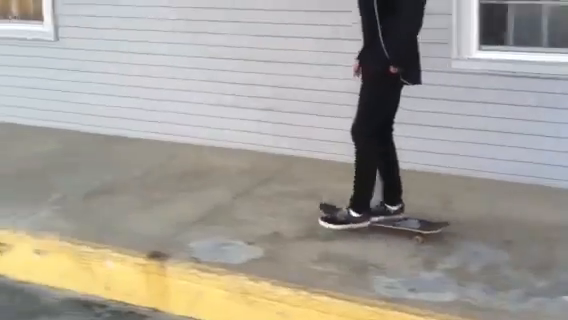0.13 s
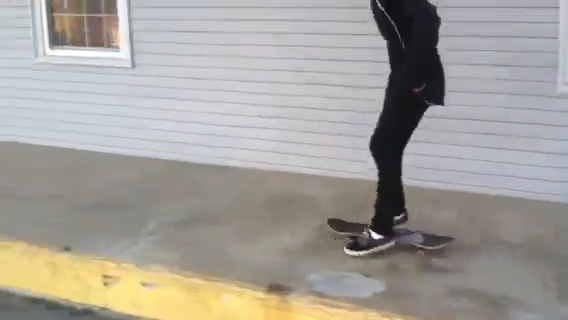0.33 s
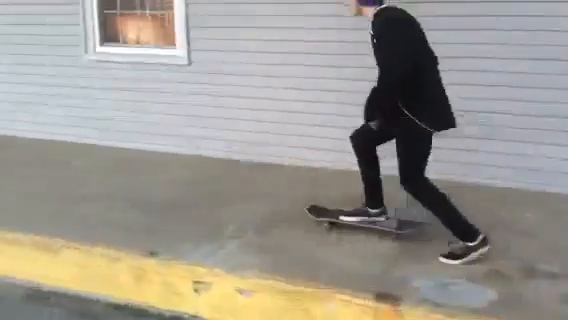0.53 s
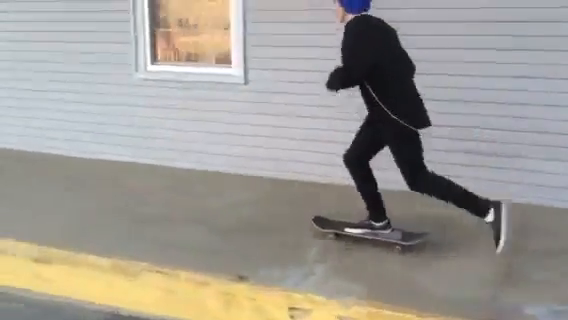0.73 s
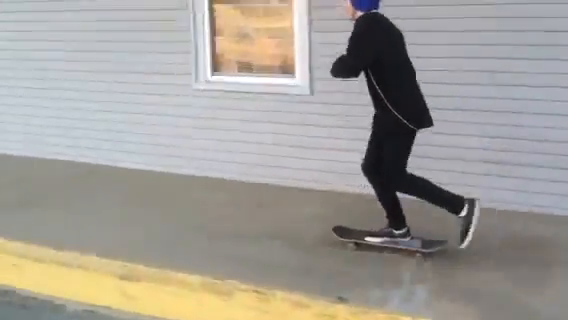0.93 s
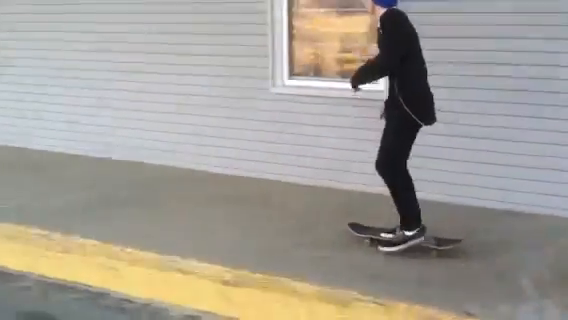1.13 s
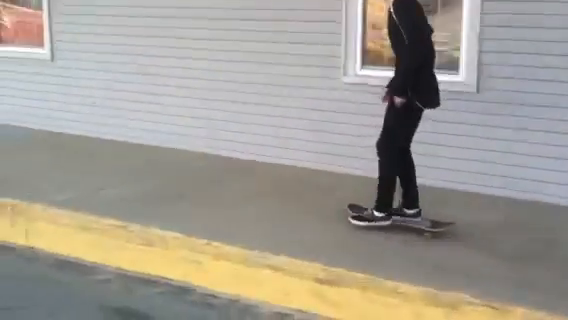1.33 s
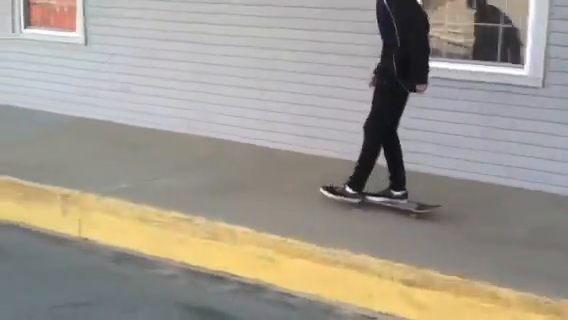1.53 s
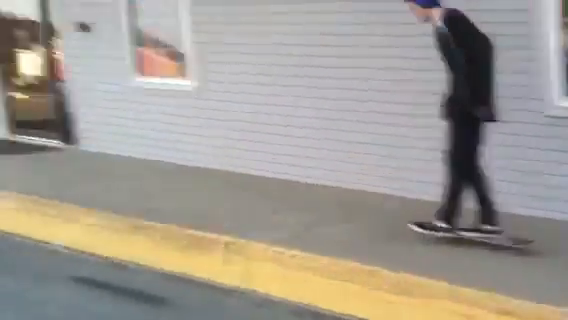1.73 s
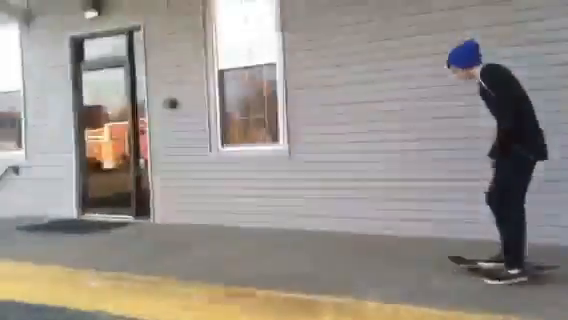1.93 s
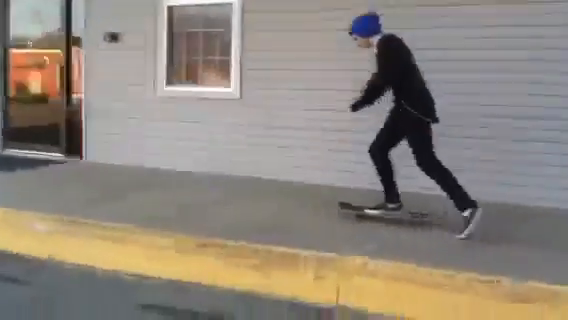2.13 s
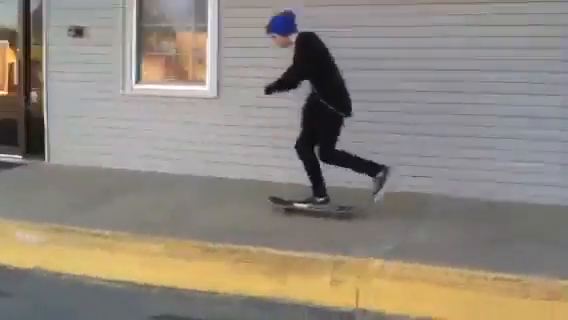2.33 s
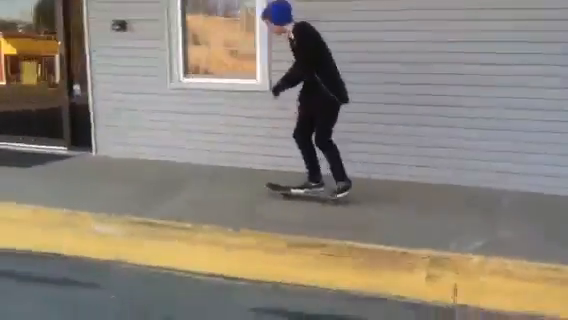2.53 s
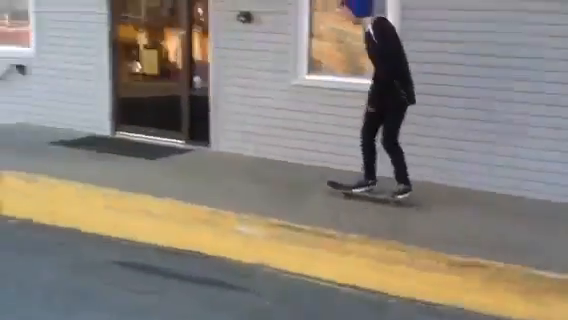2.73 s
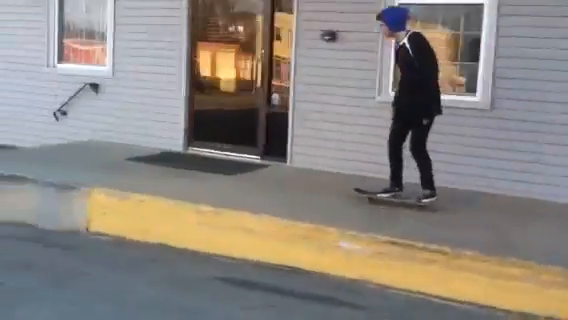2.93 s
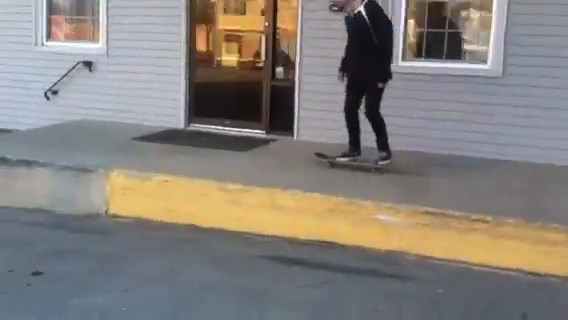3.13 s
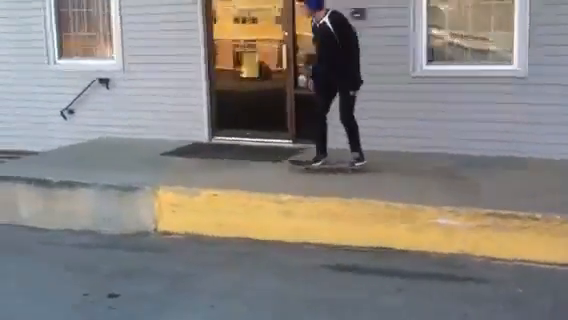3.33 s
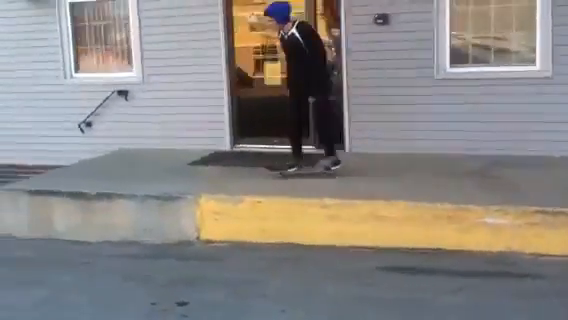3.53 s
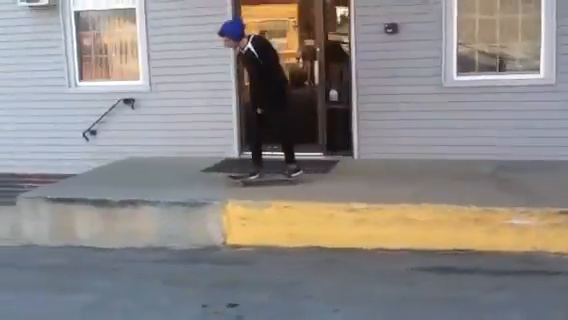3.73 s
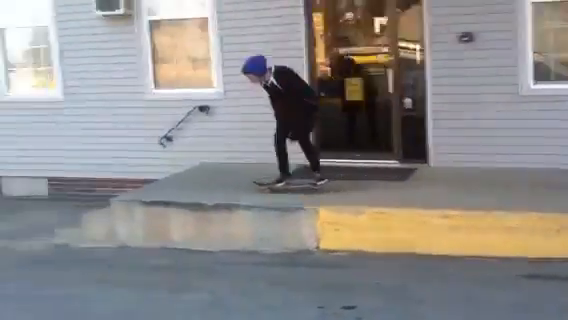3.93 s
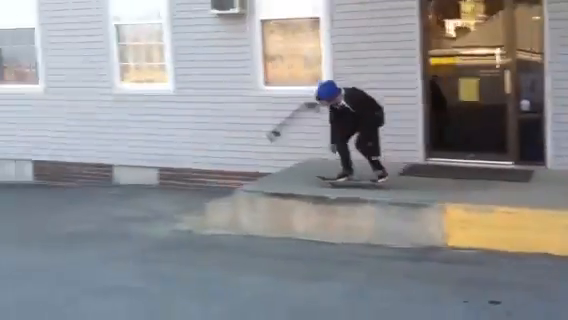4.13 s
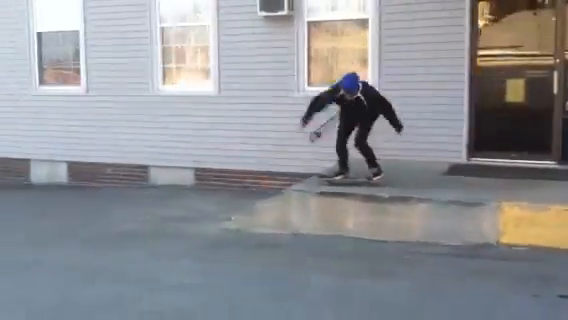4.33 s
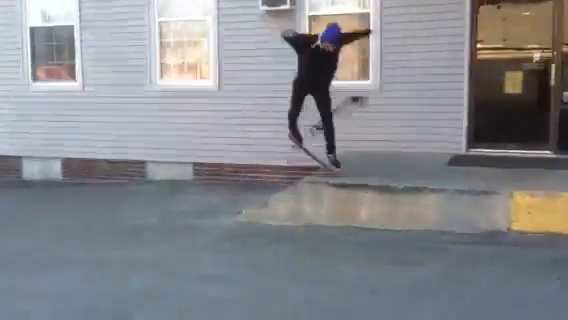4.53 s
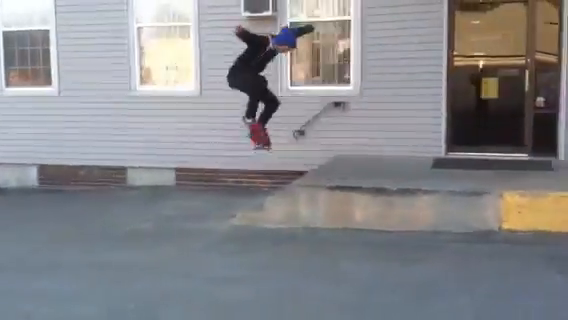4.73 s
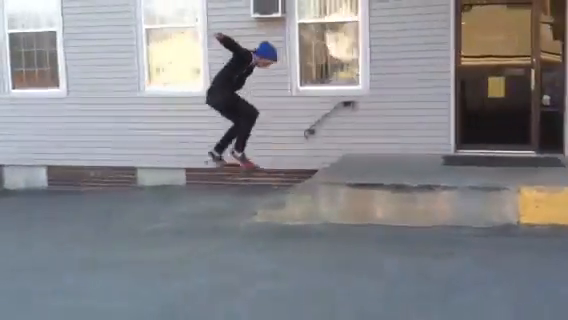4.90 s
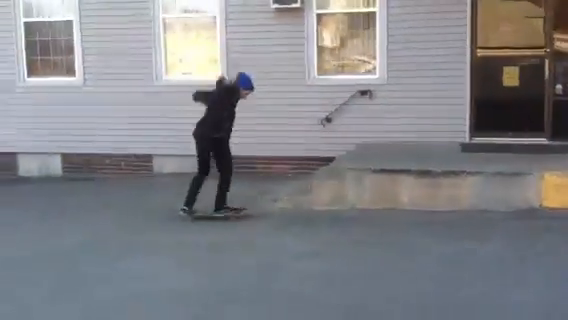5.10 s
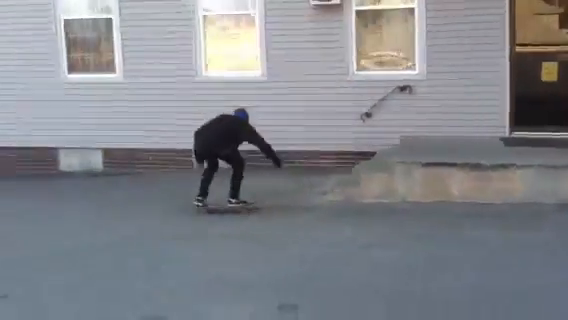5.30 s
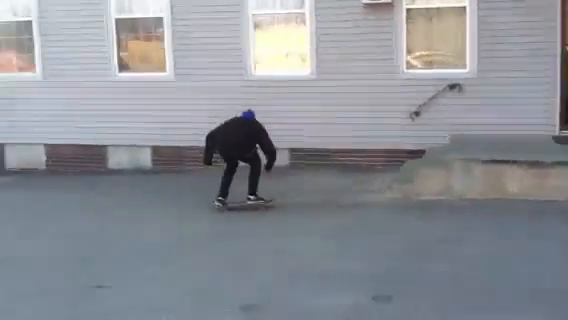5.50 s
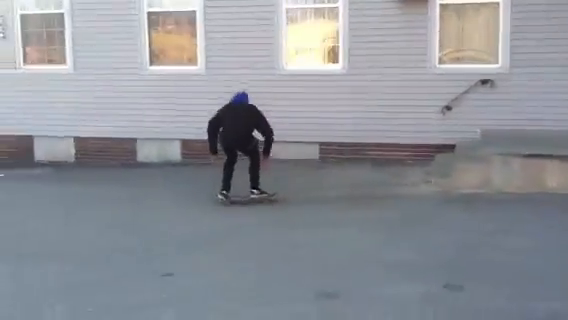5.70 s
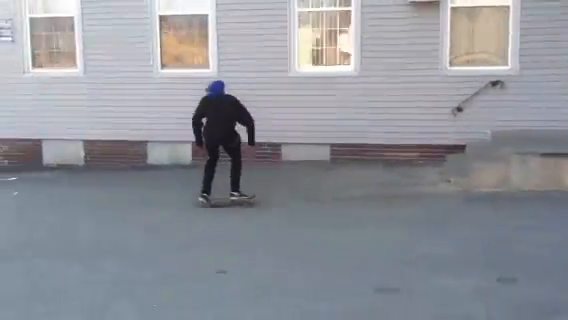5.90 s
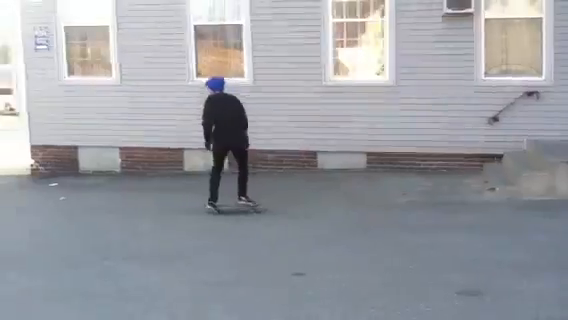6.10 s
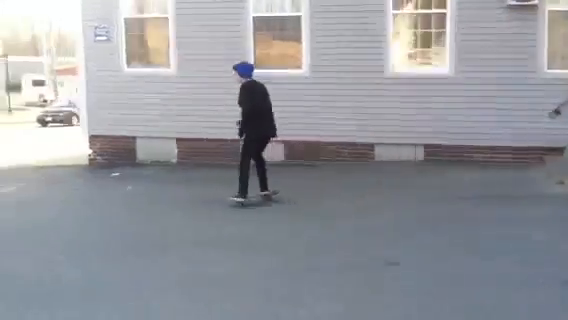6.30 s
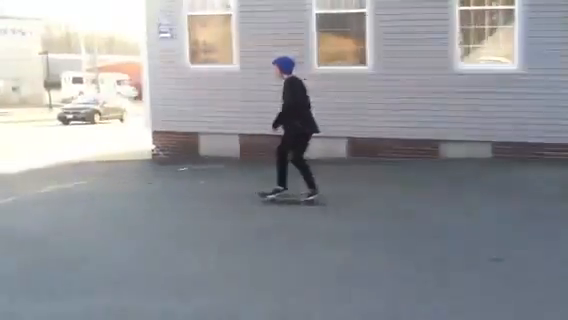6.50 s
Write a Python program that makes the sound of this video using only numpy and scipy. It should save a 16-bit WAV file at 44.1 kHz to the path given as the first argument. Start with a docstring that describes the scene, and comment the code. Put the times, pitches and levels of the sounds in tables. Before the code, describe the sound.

After a blink of silence, rolling starts abruptly at 0.13 s: a close, hollow deck roar with low thrum, and a farther board's coarse, sandy grinding. Grit crunches at 0.25-0.4, then a shoe scuffs from 0.4 to 0.75. A light wooden clatter comes at 1.05. Cracks knock at 1.3, 1.63 and 2.53, with small pebble tocks between; grinding swells around 1.75 and 2.2, with a scuff near 2.05 and faint high squeaks. A cluster of knocks and low thuds falls at 2.9-3.35, with a soft clack at 3.41. Trucks tick around 3.85. At 4.63 the tail pops sharply; rolling from the near board continues. At 5.16-5.2 the landing hits loudest, several rapid wooden clacks with plywood ringing and a faint skid. Quieter, smoother rolling follows, with small ticks and knocks, a swelling scuff peaking near 6.5, ending mid-roll. Outdoor, short dull wall reflections.

```python
"""Two skateboards on a concrete walk

Two boards roll beside a wall; the microphone travels with the nearer one. Random grit excites its deck
(hollow roar), thrum and wheel colours; cracks and stones add decaying sines. The farther rider scuffs
(filtered grit), pops the tail and lands with a clatter on asphalt (noise-driven board modes, ringing
plywood), with trucks rattling (decaying noise bursts) and a short dull tail off the surroundings."""
import sys
import numpy as np
from scipy import signal
from scipy.fft import rfft, irfft
from scipy.io import wavfile
from scipy.ndimage import uniform_filter1d, map_coordinates

SR = 44100
rng = np.random.default_rng(int(sys.argv[2]) if len(sys.argv) > 2 else 0)


def unload_audio(sound):
    """Save the sound as a 16-bit wav file, at the path given as the first command line argument."""
    columns = np.transpose(np.atleast_2d(sound))
    # keep every value between -1 and 1, then stretch to whole-number steps
    steps = np.round(np.clip(columns, -1, 1) * 32767)
    wavfile.write(sys.argv[1], SR, steps.astype(np.int16))


N = 289075

START_S, EDGE_HZ = .134, 15700  # sound onset; upper band limit

# spectra, only the shape counts: f/Hz, relative level/dB
DECK_COLOUR = [(200, -42), (400, -14.5), (550, 0), (620, 2.5), (680, -2), (760, -11), (870, -19),
               (1100, -19), (1600, -31), (6000, -83)]
THRUM_COLOUR = [(30, -42), (80, -22.5), (120, -12.5), (170, -3.5), (230, -3), (305, 1.5), (385, -6.5),
                (480, -11), (1500, -60)]
WHEEL_COLOUR = [(300, -42.5), (750, 5.5), (1030, 4.5), (1400, -2.5), (1650, -4.5), (2000, -9),
                (2350, -12.5), (2900, -23), (9000, -71.5)]
SAND_COLOUR = [(1000, -14), (2300, 5.5), (2950, 0), (4500, 2), (5500, -5), (6600, -1.5), (7900, -7),
               (9000, -3), (10400, -10.5), (12000, -15), (15500, -46)]
SHOE_COLOUR = [(700, -5), (1200, 12.5), (1750, 14), (2200, -3.5), (2800, -3), (3500, 4.5), (4400, 3),
               (5400, -8), (6600, -1.5), (8000, -7), (9000, -6), (10400, -13), (15500, -33)]
CRUNCH_COLOUR = [(100, -13), (750, 6), (1800, -5.5), (2500, -8), (4200, -5), (5300, -20.5), (6500, -7),
                 (7900, -17), (9200, -10.5), (11000, -27), (15500, -63)]
RATTLE_COLOUR = [(500, -35), (1000, 12), (2300, 8), (3000, -6.5), (4700, 0), (5700, -6.5), (15000, -59)]
PLYWOOD_COLOUR = [(300, -28), (650, 11), (880, 0), (1100, 12), (1350, 11), (1680, 7), (2050, -21),
                  (9000, -67)]

# near deck's roar over time: t/s, level/dB
NEAR_ROLL = [(0.14, -19.5), (0.42, -19), (0.57, -22.5), (1.55, -22.5), (2.25, -19.5), (3.05, -17.5),
             (4.1, -22), (4.65, -21.5), (5.2, -25), (5.3, -27), (6.05, -25.5), (6.54, -21.5)]
# changes in roar and thrum along the way: t/s, length/s, roar change/dB, thrum change/dB
ROLL_CHANGES = [(0.527, 0.12, -3.5, -1), (0.718, 0.28, -1.5, 2), (1.735, 0.21, 6.5, 3.5),
                (1.974, 0.14, -3.5, -2), (2.135, 0.2, 3, 0.5), (2.754, 2.7, 0, 2),
                (4.886, 0.11, -0.5, -4.5)]
# cracks under the near wheels: t/s, relative level/dB, swing t60/s
BUMPS = [(.384, -1, 0.014), (1.297, -2.5, 0.031), (1.361, -4, 0.02), (1.632, 9, 0.0061), (2.112, -6, 0.023),
         (2.528, 8, 0.019), (2.875, -12, 0.014), (2.928, 1, 0.049), (3.0, -3, 0.045), (3.049, 7, 0.011),
         (3.07, 6.5, 0.0091), (3.268, -0.5, 0.017), (3.344, -6.5, 0.1), (3.867, -3, 0.089),
         (4.312, -12, 0.06), (4.376, -6.5, 0.046), (4.879, -12, 0.033), (5.425, -6, 0.021),
         (5.836, -9, .035), (5.924, -6, 0.017)]
# loose stones under the wheels: t/s, relative level/dB, f/Hz
PEBBLES = [(0.806, -13, 1300), (1.017, -11, 1100), (1.123, -12.5, 1250), (2.171, -9, 1100),
           (2.367, -10, 1340), (2.469, -7, 1160), (2.611, -9, 1200), (2.745, -12, 1100), (3.906, -11, 940),
           (4.056, -11, 990)]
# low thuds and a brief swell of the thrum: t/s, relative level/dB, f/Hz
LOW_PULSES = [(3.11, -8.5, 176), (3.142, -18, 150), (3.203, -14, 160), (3.267, -13, 160), (3.298, -18, 125),
              (4.035, -14.5, 198), (4.053, -11.5, 174), (5.04, -15, 288), (5.218, -15, 181),
              (5.257, -15.5, 173)]

# coarse grinding of the rolling over time: t/s, relative level/dB
GRINDING = [(0.14, -27.5), (0.45, -26.5), (1.0, -27.5), (1.47, -30), (1.78, -23.5), (1.98, -27.5),
            (2.18, -24.5), (2.72, -25.5), (2.86, -29.5), (4.4, -33), (5.15, -33.5), (5.35, -37.5),
            (6.05, -33.5), (6.54, -30)]
# thick grit under the wheels: t/s, relative level/dB
GRAVEL = [(.24, -21), (.271, -22), (.334, -25), (.39, -16.5), (1.748, -24), (1.85, -28), (2.397, -25)]
# shoe on sandy ground or grip tape: t/s, length/s, relative level/dB, rise/s
SCUFFS = [(0.392, 0.25, -25, 0.028), (0.627, 0.13, -30, 0.043), (0.882, 0.048, -31, .02),
          (2.036, 0.096, -24.5, 0.092), (2.653, 0.16, -34, 0.027), (3.851, 0.071, -35.5, .03),
          (6.243, 0.38, -18.5, 0.26)]
# far board's struck modes: f/Hz, relative level/dB, t60/s
BOARD_MODES = [(742, 2.5, 0.022), (1086, -2.5, 0.025), (1420, -6.5, 0.021), (1650, -7, .022),
               (2100, -13.5, .016), (2810, -9.5, 0.015), (3280, -6, 0.0097), (3580, -6.5, 0.013),
               (4130, -14, 0.012), (6020, -18, .014)]
# blows on the far board:
# t/s, crunch level/dB, contact t60/s, plywood relative level/dB, clack f/Hz, clack peak before band-pass/dB
CLACKS = [(1.0405, -33, .012, -24, 1200, -12), (1.0492, -29, .008, -20, 3700, -17),
          (1.051, -29, 0.071, -20, 950, -15), (1.063, -27, 0.051, -31, 1150, -12),
          (3.413, -23.5, 0.11, -26, 4150, -21), (4.6296, -18, 0.015, -19, 1900, -7.5),
          (4.6405, -38, .025, -28, 1500, -12), (4.6415, -38, 0.032, -30, 2900, -10.5),
          (4.653, -33, .22, -36, 3400, -20), (5.1587, -15.5, 0.028, -28, 1100, -6.5),
          (5.167, -16, .011, -26, 760, -8), (5.173, -10.5, 0.023, -22, 1500, -2.5),
          (5.1883, -25, 0.099, -21, 1660, -11), (5.1975, -28, 0.018, -20.5, 700, -6)]
# scale of the trucks' random chatter: t/s, relative level/dB
CHATTER = [(1.7, -36), (2.6, -30.5), (3.2, -39.5), (4.6, -36), (5.1, -38), (5.33, -54), (5.5, -34),
           (5.9, -38)]
# harder knocks of loose trucks: t/s, relative level/dB
TICKS = [(0.5434, -35), (.914, -29), (1.02, -32), (1.252, -31), (2.325, -27), (2.68, -27), (2.685, -35),
         (2.7242, -28), (2.75, -29), (3.823, -32), (3.834, -29.5), (3.8633, -28.5), (3.87, -31),
         (4.246, -31.5), (4.431, -33), (4.697, -31.5), (4.7386, -31.5), (5.069, -34.5), (5.6176, -35),
         (5.762, -32), (6.198, -30.5)]
# loose washer's ping, higher once the rider crouches: t/s, f/Hz
WASHER = [(3.85, 4200), (4.3, 4766)]
# short fuzzy high tones, a scuff, then bearing squeaks: t/s, rms level/dB, length/s, f/Hz
SQUEAKS = [(.53, -36, 0.034, 4140), (1.67, -48.5, 0.31, 8470), (1.905, -38.5, 0.028, 6550),
           (2.225, -43, 0.049, 6600)]
# wheels skidding sideways as the landing settles: t/s, rms level/dB, length/s, f/Hz
SKIDS = [(5.2, -43, 0.32, 1660)]

DECK_SWAY = .028  # rms share by which the deck's pitch drifts
THRUM_DB, THRUM_FOLLOW = -12, 0.62  # thrum follows the roar by this share of its dB
CROSSING_S = 0.035  # ramp into and out of a roll change
SCUFF_SAG_DB_PER_S, SCUFF_RELEASE_S = 36.5, 0.039  # weight leaves the shoe; release time constant
# sand hiss follows the grinding and the roar changes by these shares of their dB
SAND_DB, SAND_FOLLOW_GRINDING, SAND_FOLLOW_ROAR = -24, 0.6, 0.22
WASHER_T60_S, WASHER_DB = 0.019, -0.5


def amp(db):
    """Decibels to gain."""
    return 10 ** (np.asarray(db) / 20)


def unit(x):
    """Scales to rms 1."""
    return x / np.sqrt(np.mean(x ** 2) + 1e-20)


def curve(rows):
    """Control joined by straight lines, per sample."""
    return np.interp(np.arange(N) / SR, *np.transpose(rows))


def add(mix, t_s, sound):
    """Mixes a sound in at t_s."""
    part = mix[round(t_s * SR):][:len(sound)]
    part += sound[:len(part)]


def butter(x, order, cut_hz, kind):
    """Butterworth filter, causal."""
    return signal.sosfilt(signal.butter(order, cut_hz, kind, fs=SR, output="sos"), x)


def colour(x, points, size=4096):
    """Minimum-phase filter of unit energy with the given spectrum, via the folded cepstrum."""
    hz, db = np.transpose(points)
    bins_hz = np.fft.rfftfreq(size, 1 / SR)
    log_gain = np.log(amp(np.interp(np.log(bins_hz + 1), np.log(hz), db)))
    cepstrum = irfft(log_gain)[:size // 2]
    cepstrum[1:] *= 2
    taps = irfft(np.exp(rfft(cepstrum, size)))
    return signal.oaconvolve(x, taps / np.linalg.norm(taps))[:len(x)]


def wander(hz):
    """Smooth random drift of rms 1: noise under a Gaussian low-pass of width hz."""
    lowpass = np.exp(-(np.fft.rfftfreq(N, 1 / SR) / hz) ** 2)
    return unit(irfft(rfft(rng.standard_normal(N)) * lowpass, N))


def grit(per_s, spread_db, smooth):
    """Stones of uneven size met at random, over a bed of fine roughness; rms 1."""
    size = amp(spread_db * np.minimum(rng.exponential(1, N), 3))
    stones = size * rng.choice([-1, 1], N) * (rng.random(N) < per_s / SR)
    return unit(unit(stones) + smooth * rng.standard_normal(N))


def dying(kicks, t60_s):
    """Turns each kick into an envelope that falls 60 dB in t60_s."""
    return signal.lfilter([1], [1, -amp(-60 / (t60_s * SR))], kicks)


def swells(rows, width_hz):
    """Each row is a short swell of a fuzzy tone: narrow-band noise under a Hann window."""
    out = np.zeros(N)
    for t_s, db, length_s, hz in rows:
        t = np.arange(round(length_s * SR)) / SR
        noise = rng.standard_normal(len(t)) + 1j * rng.standard_normal(len(t))
        band = np.exp(-(np.fft.fftfreq(len(t), 1 / SR) / width_hz) ** 2)
        fuzz = np.fft.ifft(np.fft.fft(noise) * band)
        tone = (fuzz * np.exp(2j * np.pi * hz * t)).real
        add(out, t_s, amp(db) * unit(tone * np.hanning(len(t))))
    return out


def patchy(x, depth_db):
    """Changing contact shifts the colour in random patches of frequency and time."""
    spectra = signal.stft(x, nperseg=512)[2]
    patches = uniform_filter1d(rng.standard_normal(spectra.shape), size=7, axis=0)
    patches = unit(uniform_filter1d(patches, size=9, axis=1))
    return signal.istft(spectra * amp(depth_db * patches), nperseg=512)[1][:N]


def roll_change_db(column):
    """Sums one column of the roll changes, each ramped in and out."""
    t = np.arange(N) / SR
    total_db = np.zeros(N)
    for row in ROLL_CHANGES:
        start_s, length_s = row[:2]
        edge_s = np.minimum(t - start_s, start_s + length_s - t)
        total_db += row[column] * np.clip(.5 + edge_s / CROSSING_S, 0, 1)
    return total_db


def yard(x, t60_s=0.41, tail_db=-13, dull_hz=2200):
    """Wall, kerb and ground scatter a short tail: decaying noise taps, low-passed."""
    t = np.arange(SR // 2) / SR
    taps = rng.standard_normal(len(t)) * (t > .006) * amp(-60 * t / t60_s)
    taps = butter(taps / np.linalg.norm(taps), 2, dull_hz, "low")
    return x + amp(tail_db) * signal.oaconvolve(x, taps)[:N]


def far_wheels(ground):
    """Hard wheels grind over coarse grains."""
    grains = grit(per_s=600, spread_db=5.5, smooth=1.0) * amp(1.37 * ground + 0.45 * wander(43))
    return unit(colour(grains, WHEEL_COLOUR)) * amp(curve(GRINDING) - 0.86)


def scuffing():
    """Each scrape of a shoe swells, sags while it drags, and dies as the foot lifts."""
    out, t = np.zeros(N), np.arange(SR) / SR
    for t_s, length_s, db, rise_s in SCUFFS:
        lift = np.exp(-np.maximum(t - length_s, 0) / SCUFF_RELEASE_S)
        add(out, t_s, np.minimum(t / rise_s, 1) * amp(db - SCUFF_SAG_DB_PER_S * t) * lift)
    return out


def sand(ground):
    """Fine sand hisses under the wheels; a shoe dragging on it excites its own broad colour."""
    fine = grit(per_s=1300, spread_db=9.0, smooth=1.83) * amp(0.9 * ground + 0.43 * wander(76))
    drag = grit(per_s=1500, spread_db=-0.5, smooth=0.41) * amp(2.35 * wander(61))
    hiss_db = SAND_DB + SAND_FOLLOW_GRINDING * curve(GRINDING)
    hiss_db += SAND_FOLLOW_ROAR * roll_change_db(column=2)
    hiss = unit(colour(fine, SAND_COLOUR)) * amp(hiss_db)
    shoe = unit(colour(drag, SHOE_COLOUR)) * scuffing()
    return hiss + shoe


def crackle(ground, patch_s=0.0062, loose_db=-11, snap_db=-8):
    """Loose grit cracks under the wheels, grain by grain, and crunches where it lies thick."""
    t = np.arange(N) / SR
    thick = sum(amp(db) * np.exp(-((t - t_s) / patch_s) ** 2) for t_s, db in GRAVEL)
    loose = amp(curve(GRINDING) + loose_db + 2 * ground)
    grains = thick * grit(per_s=1500, spread_db=3.5, smooth=0)
    grains += loose * grit(per_s=220, spread_db=2.5, smooth=0)
    return colour(grains, WHEEL_COLOUR) + amp(snap_db) * colour(grains, RATTLE_COLOUR)


def rattle(per_s=65, knock_db=2, t60_s=0.032):
    """Trucks chatter all along the ride, with some harder knocks; each kick also pings a washer."""
    kicks = (rng.random(N) < per_s / SR) * rng.random(N) * amp(curve(CHATTER))
    for t_s, db in TICKS:
        add(kicks, t_s, amp([db + knock_db]))
    envelope = uniform_filter1d(dying(kicks, t60_s), size=30)
    chatter = colour(envelope * rng.standard_normal(N), RATTLE_COLOUR)
    turns = np.cumsum(curve(WASHER) + 200 * wander(59.9)) / SR
    ping = dying(kicks, WASHER_T60_S) * np.sin(2 * np.pi * turns)
    return amp(3.0) * chatter + amp(WASHER_DB) * ping


def squeaks():
    """Short fuzzy high tones: a scuff, then bearing squeaks."""
    return swells(SQUEAKS, width_hz=540)


def wheel_skids():
    """Wheels skid sideways: a fuzzy tone."""
    return swells(SKIDS, width_hz=240)


def clacks(contact_s=0.003, rise_s=0.00077, ring_t60_s=0.28, focus_db_per_octave=7, band_hz=(520, 8000)):
    """Chatter of contact crunches and drives the modes nearest its pitch; then the plywood shudders."""
    crunches, knocks, kicks = np.zeros(N), np.zeros(N), np.zeros(N)
    t = np.arange(SR // 4) / SR
    for t_s, db, t60_s, ring_db, hz, knock_db in CLACKS:
        contact = np.minimum(t / rise_s, 1) * amp(-60 * np.maximum(t - contact_s, 0) / t60_s)
        add(crunches, t_s, amp(db) * contact * rng.standard_normal(len(t)))
        modes = np.zeros(len(t))
        for mode_hz, mode_db, mode_t60_s in BOARD_MODES:
            focused_db = mode_db - focus_db_per_octave * abs(np.log2(mode_hz / hz))
            modes += np.sin(2 * np.pi * mode_hz * t) * amp(focused_db - 60 * t / mode_t60_s)
        knock = signal.fftconvolve(contact * rng.standard_normal(len(t)), modes)
        add(knocks, t_s, amp(knock_db) * knock / abs(knock).max())
        add(kicks, t_s, amp([2 * ring_db]))  # energies of the rings add up
    ring = np.sqrt(dying(kicks, ring_t60_s / 2))  # energy back to amplitude
    plywood = ring * colour(rng.standard_normal(N), PLYWOOD_COLOUR)
    knocks = butter(knocks, 2, band_hz, "band")  # a thin board radiates little bass
    return colour(crunches, CRUNCH_COLOUR) + knocks + plywood * amp(1.8 * wander(90) - 5.5)


def low_pulses(width_s=0.0069):
    """Low thuds and a brief swell of the thrum: cosines under a sech envelope."""
    out, t = np.zeros(N), np.arange(-SR // 20, SR // 20) / SR
    for t_s, db, hz in LOW_PULSES:
        pulse = np.cos(2 * np.pi * (hz * t + rng.random())) / np.cosh(2 * t / width_s)
        add(out, t_s + t[0], amp(db) * pulse)
    return out


def pebbles(t60_s=0.0082, overtone=1.47, overtone_db=-6):
    """A wheel jumps a loose stone: one short, dry tock of two partials."""
    out, t = np.zeros(N), np.arange(SR // 20) / SR
    for t_s, db, hz in PEBBLES:
        tock = np.sin(2 * np.pi * hz * t) - amp(overtone_db) * np.sin(2 * np.pi * overtone * hz * t)
        add(out, t_s, tock * amp(db - 60 * t / t60_s))
    return out


def bumps(deck_hz=615, knock_hz=1000, knock_db=-3, low_cut_hz=330):
    """A wheel drops in a crack: a dull knock and a few swings of the deck."""
    out, t = np.zeros(N), np.arange(SR // 8) / SR
    for t_s, db, t60_s in BUMPS:
        swing_hz = deck_hz * rng.uniform(1.0, 1.04)
        swing = np.sin(2 * np.pi * swing_hz * t) * amp(-60 * t / t60_s)
        knock = np.sin(2 * np.pi * knock_hz * t) * amp(knock_db - 60 * t / 0.006)
        add(out, t_s, amp(db) * (swing + knock) * (1 - np.exp(-t / 0.001)))
    return butter(out, 2, low_cut_hz, "high")  # the bumps keep no deep bass


def near_board(ground):
    """Stones shake the deck's main resonance, make the wheels thrum, and bite into their hard rims."""
    stones = grit(per_s=550, spread_db=1.5, smooth=0.73) * amp(1.09 * ground)
    roar_db = curve(NEAR_ROLL) + roll_change_db(column=2)
    thrum_db = THRUM_DB + THRUM_FOLLOW * curve(NEAR_ROLL) + roll_change_db(column=3)
    # shifting weight bends the deck's pitch: resample at a drifting rate
    positions = np.arange(N) + np.cumsum(DECK_SWAY * wander(7))
    deck = map_coordinates(colour(stones, DECK_COLOUR), [positions], mode="mirror")
    roar = unit(deck) * amp(roar_db)
    thrum = unit(colour(grit(per_s=760, spread_db=3.0, smooth=0.77), THRUM_COLOUR)) * amp(thrum_db)
    bite = unit(colour(stones, WHEEL_COLOUR)) * amp(roar_db - 22.5)
    return roar + thrum + bite


def scene():
    """Rough and smooth patches of ground sway the rolling sounds together."""
    ground = wander(40)
    grinding = patchy(far_wheels(ground) + sand(ground), depth_db=2.0) * amp(-1.08)
    far = grinding + crackle(ground) + clacks() + rattle() + squeaks() + wheel_skids()
    near = near_board(ground) + bumps() + pebbles() + low_pulses()
    return (near + yard(far))[None]


def record(dry, low_cut_hz=66):
    """The microphone opens abruptly, sheds deep bass and rounds off peaks; then the band limit."""
    opened = np.clip((np.arange(N) / SR - START_S) / .003, 0, 1)
    thin = butter(dry * opened, 2, low_cut_hz, "high")
    rounded = thin / (1 + (thin / .9) ** 6) ** (1 / 6)
    band_limit = signal.firwin(511, EDGE_HZ, window=("kaiser", 9), fs=SR)
    return signal.oaconvolve(rounded, band_limit[None], "same")


dry = scene()
out = record(dry)
unload_audio(out)
```